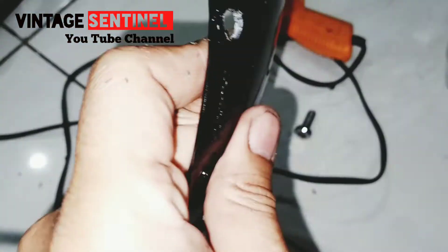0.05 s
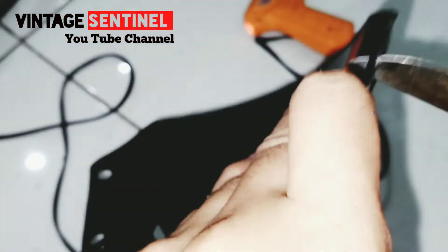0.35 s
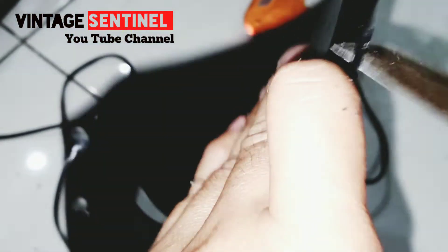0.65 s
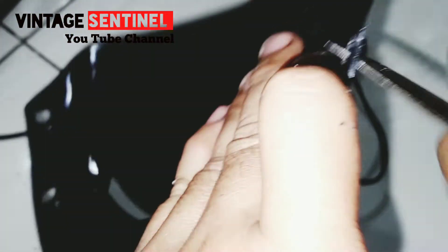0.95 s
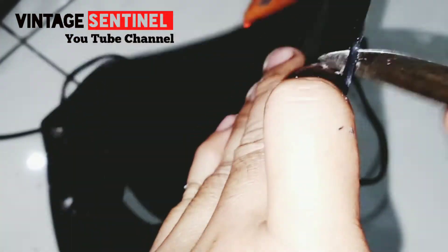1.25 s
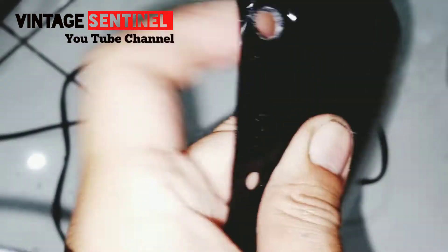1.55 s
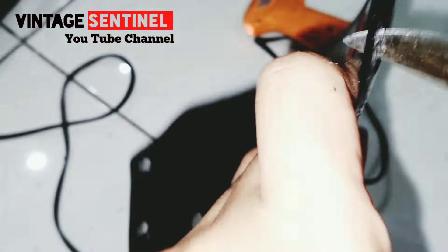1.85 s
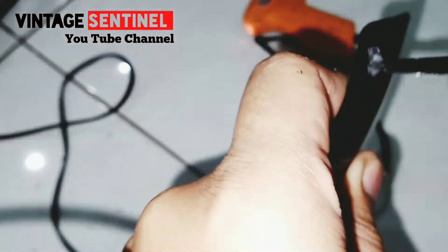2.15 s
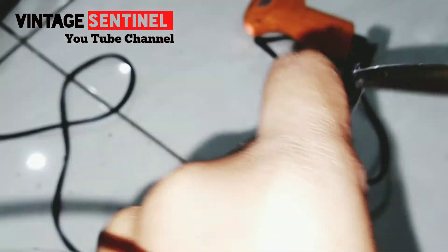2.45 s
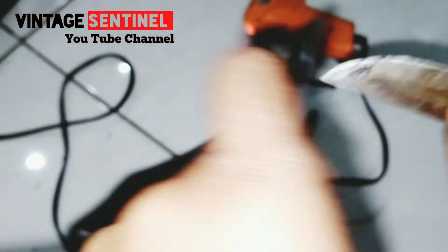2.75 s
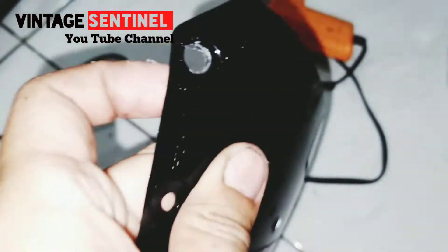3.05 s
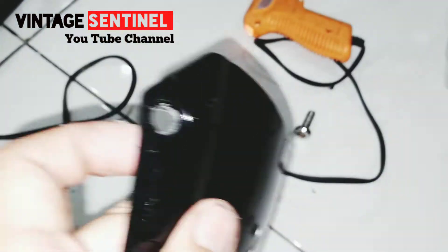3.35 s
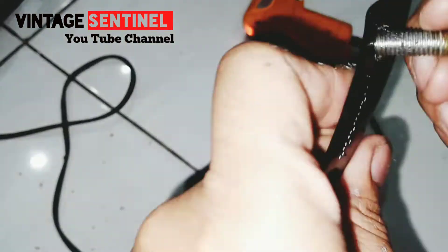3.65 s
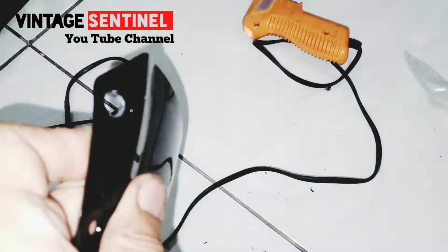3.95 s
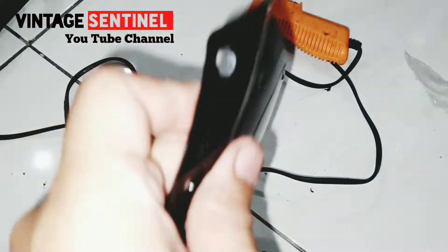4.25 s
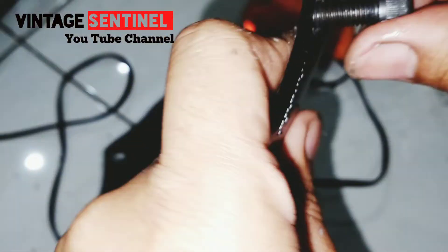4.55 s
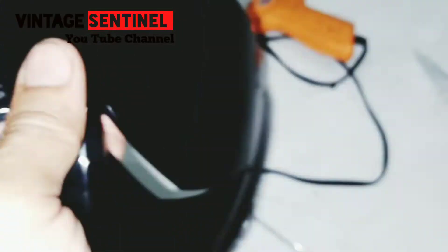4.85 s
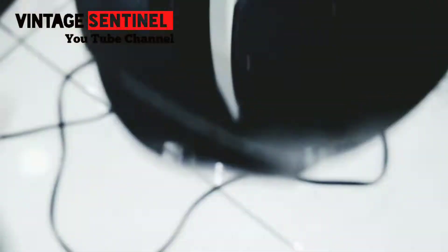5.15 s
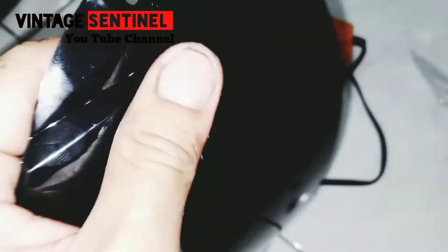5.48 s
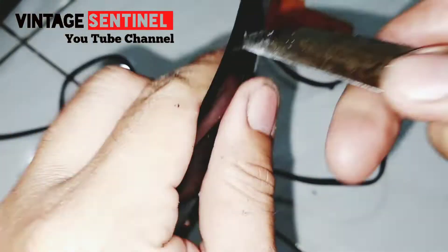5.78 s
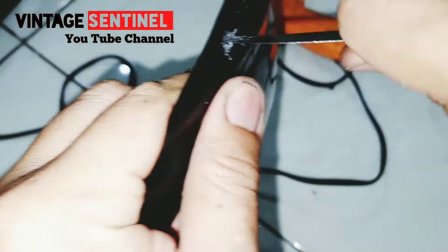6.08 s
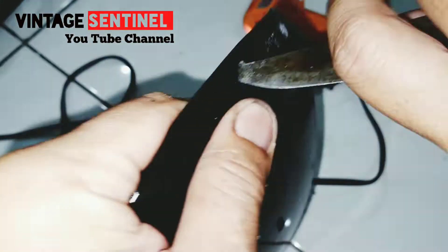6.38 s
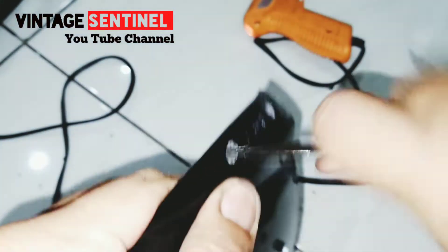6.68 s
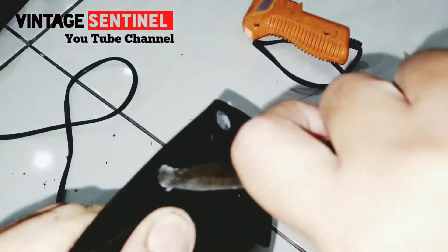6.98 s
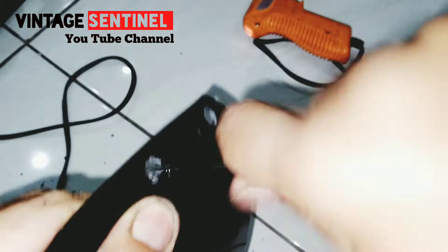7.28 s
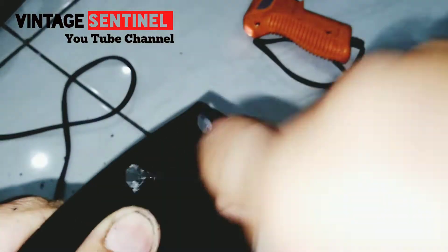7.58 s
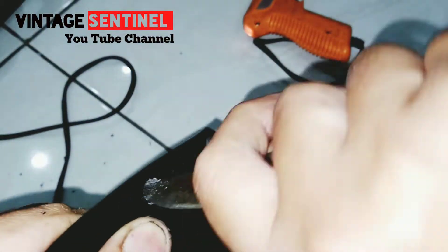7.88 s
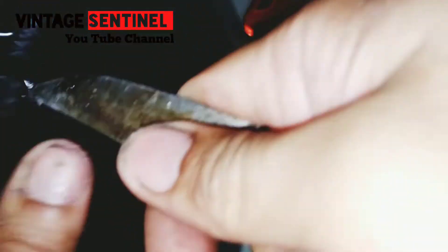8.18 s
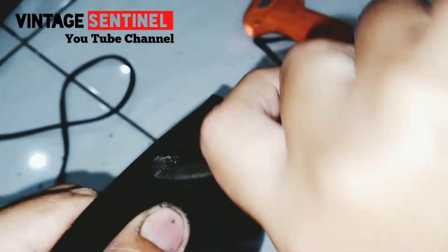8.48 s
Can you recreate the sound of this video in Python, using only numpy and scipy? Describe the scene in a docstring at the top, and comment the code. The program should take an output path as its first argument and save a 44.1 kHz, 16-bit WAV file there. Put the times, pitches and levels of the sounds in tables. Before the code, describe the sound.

A steel blade shaves the edge of a hard plastic shell, close to the microphone in a tiled room with a short echo. From 0.3 to 1.4 seconds it rasps back and forth about ten times a second, catching in bright, sharp snaps, the loudest slightly distorted. A faint, dull outdoor drone fades away underneath. Two more bouts run from 1.7 to 2.8 seconds. Between 2.9 and 4.3 seconds hands bump and rub the plastic with soft, low thuds, and a steel tool clinks on the floor at 3 seconds and again around 4 to 4.3. Brief scrapes come at 3.7 and 4.7 seconds. A hushed pause follows, with a few soft fingertip taps. From 5.9 to 8 seconds the scraping returns, grittier and dense with snaps and hollow knocks. A last bout runs from 8.3 seconds to the end, near 8.7.

```python
"""Shaving a plastic shell

A steel blade works the edge of a hard plastic shell, close to the microphone in a tiled room. It saws
to and fro about ten times a second, catching and letting go in snaps that ring the shell and overload
the recorder. Between bouts the hands shift their grip and a steel tool clinks on the floor. A dull
drone from outdoors fades away, and a noise suppressor hushes the pauses, where faint blips remain."""
import sys
import numpy as np
from scipy import signal
from scipy.fft import rfft, irfft, next_fast_len
from scipy.io import wavfile
from scipy.ndimage import uniform_filter1d, map_coordinates

SR = 44100
rng = np.random.default_rng(int(sys.argv[2]) if len(sys.argv) > 2 else 0)


def bounce(signal):
    """Save signal as a 16-bit WAV file at the path given by the first command-line argument."""
    frames = np.transpose(np.atleast_2d(signal))
    limited = np.clip(frames, -1, 1)
    pcm = np.round(limited * 32767).astype(np.int16)
    wavfile.write(sys.argv[1], SR, pcm)


N = 380583


def amp(db):
    return 10 ** (np.asarray(db) / 20)


def unit_rms(x):
    return x / np.sqrt(np.mean(x ** 2) + 1e-20)


def curve_at(points, hz):
    """Read (frequency, value) points along a log frequency axis."""
    knots_hz, values = np.transpose(points)
    return np.interp(np.log(hz + 1), np.log(knots_hz + 1), values)


def add(track, start_s, sound):
    part = track[max(round(start_s * SR), 0):][:len(sound)]
    part += sound[:len(part)]


def wobble(rate_hz):
    """A smooth random curve with rate_hz knots a second."""
    knots = rng.standard_normal(int(N * rate_hz / SR) + 4)
    return map_coordinates(knots, [np.arange(N) * rate_hz / SR])


def filtered(x, response):
    size = next_fast_len(N + SR // 2)
    return irfft(rfft(x, size) * response(np.fft.rfftfreq(size, 1 / SR)), size)[:N]


def noise(colour):
    return unit_rms(filtered(rng.standard_normal(N), lambda hz: amp(curve_at(colour, hz))))


def band(x, kind, hz, order=2):
    return signal.sosfilt(signal.butter(order, hz, kind, fs=SR, output="sos"), x)


# Spectra of the outdoor drone, the hands' rumble and the hiss: frequency_hz, gain_db
DRONE_SPECTRUM = [(100, -16.5), (400, 9), (650, -13), (1500, -31.5), (4500, -18), (7000, -46.5)]
RUMBLE_SPECTRUM = [(25, -13), (90, 2), (190, 1), (300, -19), (600, -31.5), (4000, -61.5)]
HISS_SPECTRUM = [(500, 3), (4800, 0.5), (7000, -17)]
# The drone fades while the hands rumble on near the microphone: time_s, drone_db, rumble_db
BACKGROUND_LEVELS = [(0, -53, -66), (1.199, -48.5, -61), (2.5, -68, -51.5), (3.2, -77.5, -60.5),
                     (5.6, -80, -68), (6.4, -83, -53), (7.702, -78.5, -73)]
def background(hiss_db=-71, waver_db=3, swell_db=2.9):
    """A dull drone from outdoors, the unsteady rumble of the hands and a faint steady hiss."""
    times, *levels = np.transpose(BACKGROUND_LEVELS)
    drone_db, rumble_db = [np.interp(np.arange(N) / SR, times, level) for level in levels]
    rumble = amp(rumble_db + waver_db * wobble(60) + swell_db * wobble(8)) * noise(RUMBLE_SPECTRUM)
    return amp(drone_db) * noise(DRONE_SPECTRUM) + rumble + amp(hiss_db) * noise(HISS_SPECTRUM)


# Decay of the tiled room: frequency_hz, t60_s
ROOM_DECAY = [(200, 0.21), (2500, 0.19), (5000, 0.16), (12000, 0.13)]
def tiled_room(x, delay_s=.004):
    """The hard walls answer, ever differently as the hands move; the treble dies first."""
    out, hop = np.zeros(N), SR // 8
    for start in range(0, N, hop):
        hz, t, spectrum = signal.stft(rng.standard_normal(SR // 2), SR, nperseg=256)
        decay = amp(-60 * t / curve_at(ROOM_DECAY, hz)[:, None])
        tail = signal.istft(spectrum * decay, SR, nperseg=256)[1]
        reflections = signal.fftconvolve(x[start:start + hop], tail / np.linalg.norm(tail))
        add(out, start / SR + delay_s, reflections)
    return out


def suppressor_blips(gain_db=-57, spread_db=2, centre_hz=2100, width_hz=380, rise_s=.008):
    """Faint, scattered, narrow-pitched blips of noise, heard in the pauses."""
    out, t = np.zeros(N), np.arange(SR // 16) / SR
    envelope = t / rise_s * np.exp(-t / rise_s)
    for start_s in rng.uniform(0, N / SR, size=480):
        hz = np.clip(centre_hz * np.exp(.7 * rng.standard_normal()), 500, 5500)
        blip = unit_rms(band(rng.standard_normal(len(t)), "bandpass", [hz, hz + width_hz]))
        add(out, start_s, amp(gain_db + spread_db * rng.standard_normal()) * blip * envelope)
    return out


# A low pop under a loud, overloaded snap (first row), then fingertips on the shell: time_s, level_db
LOW_POPS = [(2.245, -21), (2.895, -32), (3.134, -33), (3.449, -29), (4.878, -45), (5.2, -46), (5.36, -45),
            (5.4, -33)]
def low_pops(pitch_hz=135, decay_s=.005, tick_db=-24):
    """A brief low pulse with a faint tick on top."""
    out, t = np.zeros(N), np.arange(-SR // 50, SR // 30) / SR
    pulse = np.cos(2 * np.pi * pitch_hz * t)
    for time_s, db in LOW_POPS:
        tick = amp(tick_db) * unit_rms(band(rng.standard_normal(len(t)), "lowpass", 2200, order=1))
        add(out, time_s + t[0], amp(db) * (pulse + tick) * np.exp(-np.abs(t) / decay_s))
    return out


# Hands bump and rub the shell, close up: start_s, gain_db, extra_rub_db
HAND_BUMPS = [(1.704, -23, -17), (2.042, -26, -5.5), (2.159, -24.5, -7), (2.93, -21, -18.5),
              (3.047, -26, 9.5), (3.109, -23.5, -9.5), (3.707, -19, -13), (3.779, -30.5, 5),
              (3.886, -24.5, 2), (3.995, -20, -12), (4.057, -27, -1.5), (4.183, -38, 14), (4.21, -41, 14),
              (6.841, -34.5, -10), (7.465, -35.5, -5)]
def hand_bumps(thud_db=-5, rub_db=-7, rise_s=.021, decay_s=.029):
    """Soft flesh on plastic: a low thud and a dull rub, without ring."""
    out, t = np.zeros(N), np.arange(SR // 6) / SR
    envelope = (1 - np.exp(-t / rise_s)) * np.exp(-(t / decay_s) ** 2)
    for start_s, db, extra_rub_db in HAND_BUMPS:
        flesh, skin = rng.standard_normal((2, len(t)))
        thud = amp(thud_db) * unit_rms(band(flesh, "bandpass", [50, 150], order=3))
        rub = amp(rub_db + extra_rub_db) * unit_rms(band(skin, "bandpass", [280, 680]))
        add(out, start_s, amp(db) * (thud + rub) * envelope)
    return out


def ring(force, modes):
    """Damped modes driven by a force; the small shell radiates little below them."""
    t = np.arange(SR // 40) / SR
    response = sum((-1) ** k * amp(db) * width * np.exp(-np.pi * width * t) * np.sin(2 * np.pi * hz * t)
                   for k, (hz, width, db) in enumerate(modes))
    return band(signal.fftconvolve(force, response)[:len(force)], "highpass", .7 * modes[0][0])


# Bending modes of a steel tool's shaft and close modes of its flat tip: pitch_hz, gain_db
SHAFT_MODES = [(1830, -9), (3300, 1), (5570, -1), (8700, -10.5), (12450, -19)]
TIP_MODES = [(1520, -24), (2486, -18), (3031, -9.5), (4000, -4.5), (4372, -1), (4554, 2), (5443, -11),
             (6190, -16), (6815, -18)]
# The tool bounces on the floor tiles, except at 3.3 s, which is a very faint, high tinkle in the
# pause: start_s, shaft_gain_db, tip_gain_db
CLINKS_AND_TINKLE = [(2.979, -40, -25.5), (3.302, -69, -58), (4.02, -40, -54.5), (4.228, -50, -38.5),
                     (4.287, -47, -38), (4.32, -41, -49)]
def clinks(gain_db=-6, attack_s=.004, chatter_s=.016, damp_s=.115, scuff_db=-8):
    """Steel chatters on tile, feeding each mode by chance, and rattles until the hand damps it."""
    out, t = np.zeros(N), np.arange(SR // 3) / SR

    def struck(modes, t60_s):
        return sum(amp(db - 60 * t / t60_s) * np.sin(2 * np.pi * hz * t) for hz, db in modes)

    shaft, tip = struck(SHAFT_MODES, t60_s=.08), struck(TIP_MODES, t60_s=.16)
    damping = np.exp(-(t / damp_s) ** 4)
    for start_s, shaft_db, tip_db in CLINKS_AND_TINKLE:
        contact = amp(4 * wobble(200)[:len(t)]) * (1 - np.exp(-t / attack_s)) * np.exp(-t / chatter_s)
        force = rng.standard_normal(len(t)) * contact
        clink = amp(tip_db + scuff_db) * unit_rms(ring(force, EDGE_MODES))  # scuff under the tones
        for db, response in ((shaft_db, shaft), (tip_db, tip)):
            rattle = amp(2.5 * wobble(170)[:len(t)])
            clink += amp(db) * unit_rms(rattle * signal.fftconvolve(force, response)[:len(t)])
        add(out, start_s, amp(gain_db) * clink * damping)
    return out


def blade_ring(cut, centre_hz=4450, width_hz=600, t60_s=.075, gain_db=-25):
    """The thin blade rings on briefly after every catch, in a cluster of close modes."""
    t = np.arange(SR // 5) / SR
    cluster_hz = [centre_hz - width_hz / 2, centre_hz + width_hz / 2]
    tail = band(rng.standard_normal(len(t)), "bandpass", cluster_hz) * amp(-60 * t / t60_s)
    return amp(gain_db) * signal.fftconvolve(cut, tail / np.linalg.norm(tail))[:N]


def rim_echo(force, reflection=.55, trip_s=.0008):
    """The bending wave returns from the rim after a trip that differs with each contact, colouring it."""
    lag = 1 + int(trip_s * SR * np.exp(.3 * rng.standard_normal()))
    return force - reflection * np.pad(force, (lag, 0))[:len(force)]


# Resonances of the cut edge and of the whole flexing panel: pitch_hz, width_hz, gain_db
EDGE_MODES = [(4290, 1120, 0), (4697, 1310, -2.5), (10500, 14000, -48.5)]
PANEL_MODES = [(380, 130, -18.5), (600, 150, -22), (870, 130, 1.5), (1200, 220, 0), (1710, 110, -0.5)]
# Resonances of the shell's wall: pitch_ratio, width_hz, gain_db
WALL_MODES = [(.76, 370, 13), (1, 306, 20.5), (1.08, 370.7, -11.5)]
# The wall follows the grip and the place of the cut: time_s, pitch_hz, level_re_edge_db
WALL_TUNING = [(0.303, 2314, -10), (1.001, 2240, -1.5), (1.949, 2260, -1), (2.25, 2480, 3),
               (2.5, 2740, 4.5), (2.75, 2655, 1.5), (3.699, 2150, -1.5), (6, 2504, -3), (7.002, 2155, -11),
               (8.6, 2100, -11.5)]
# Gritty treble of the cut at the usual bite: time_s, level_re_edge_db
GRIT_LEVELS = [(0.3, -31), (0.9, -38), (2.4, -29), (4.7, -48), (6.3, -23.5), (7.6, -24.5), (8.5, -23)]
def shell(force, time_s, db, panel_db, grit_hz=(7500, 11000), usual_bite_db=-22, grit_db_per_db=.35):
    """The shell rings; the point of contact shifts its resonances, and a hard bite is grittier."""
    def tuned(modes, factor):
        return [(pitch * factor, width, gain) for pitch, width, gain in modes]

    times, pitches, levels = np.transpose(WALL_TUNING)
    edge_shift, wall_shift = 1 + np.array([.04, .02]) * rng.standard_normal(2)
    wall_hz = wall_shift * np.interp(time_s, times, pitches)
    grit_db = np.interp(time_s, *np.transpose(GRIT_LEVELS)) + grit_db_per_db * (db - usual_bite_db)
    force = rim_echo(force)
    edge = unit_rms(ring(force, tuned(EDGE_MODES, edge_shift)))
    wall = amp(np.interp(time_s, times, levels)) * unit_rms(ring(force, tuned(WALL_MODES, wall_hz)))
    panel = amp(panel_db) * unit_rms(ring(force, PANEL_MODES))
    grit = amp(grit_db) * unit_rms(band(force, "bandpass", grit_hz))
    return amp(db) * (edge + wall + panel + grit)


# The blade brushes the edge lightly: start_s, gain_db
LIGHT_TOUCHES = [(.27, -45.5), (1.699, -47), (2.07, -49.5), (2.93, -51.5), (3.7, -45.5), (3.617, -48.5),
                 (4.504, -50), (5.693, -46), (8.262, -38)]
# Bouts of sawing: start_s, first_push_s, end_s, period_s, push_gain_db, slide_gain_db, panel_re_edge_db
SAWING_BOUTS = [(0.335, .402, 1.42, .1265, -22, -32, -15),
                (1.755, 1.783, 2.053, 0.084, -24.5, -37.5, -15.5),
                (2.207, 2.205, 2.8, .1025, -30, -37.5, -12.5),
                (3.725, 3.786, 3.975, 0.102, -35.5, -42, -8.5), (4.625, 4.707, 4.77, .1, -27.5, -42, -8),
                (5.887, 5.887, 6.245, 0.12, -29.5, -33.5, -7.5),
                (6.268, 6.273, 7.505, .0925, -24, -30.5, -13), (7.507, 7.548, 8.02, 0.13, -22.5, -29, -12),
                (8.287, 8.315, 8.65, 0.094, -28.5, -30.5, -10)]
def strokes(push_s=.04, return_s=.028, touch_s=.03, lift_s=.06, spread_db=.46, touch_panel_db=-9):
    """The blade slides through each bout, biting and dragging back: start_s, end_s, gain_db, panel_db."""
    rows = [(start_s, start_s + touch_s, db, touch_panel_db) for start_s, db in LIGHT_TOUCHES]
    for start_s, first_push_s, end_s, period_s, push_db, slide_db, panel_db in SAWING_BOUTS:
        rows.append((start_s, end_s, slide_db, panel_db))
        push = (push_s, push_db, panel_db)
        way_back = (return_s, push_db - 7, panel_db + 2)  # lighter and duller
        for k, mid_s in enumerate(np.arange(first_push_s, min(end_s - lift_s, N / SR), period_s / 2)):
            length_s, db, stroke_panel_db = way_back if k % 2 else push
            db += spread_db * rng.standard_normal()
            rows.append((mid_s - length_s / 2, mid_s + length_s / 2, db, stroke_panel_db))
    return rows


def shaving(gain_db=-3, slips_per_s=200, spread_db=6.8, slip_s=.0014, fade_s=.015, ease_share=.09):
    """The sliding blade sticks and slips in a dense, uneven rasp that shakes the shell."""
    times = np.cumsum(rng.gamma(3, 1 / 3, 4000)) / slips_per_s
    times = times[times < N / SR]
    slips = np.bincount((times * SR).astype(int), amp(spread_db * rng.standard_normal(len(times))), N)
    drag = .4 + unit_rms(signal.lfilter([1], [1, -np.exp(-1 / (slip_s * SR))], slips))
    friction, out = drag * rng.standard_normal(N), np.zeros(N)
    for start_s, end_s, db, panel_db in strokes():
        rasp = friction[int(start_s * SR):int(end_s * SR)]
        ease_off = np.minimum(1, np.linspace(1, 0, len(rasp)) / ease_share)
        fades = signal.windows.tukey(len(rasp), 2 * fade_s / (end_s - start_s))
        force = np.pad(unit_rms(rasp * ease_off * fades), (0, SR // 100))
        add(out, start_s, shell(force, (start_s + end_s) / 2, db + gain_db, panel_db))
    return out


# Right at the microphone, the blade catches sharply or lands flat on the hollow panel: time_s, gain_db
BLADE_SNAPS = [(.32, 5.5), (.3835, -4), (.3936, -7), (.4134, -11), (.531, 0), (.5452, -11), (.599, 0),
               (.644, -6), (.728, -8), (.7475, -6), (.893, -9), (.912, -6), (.9966, -4.5), (1.0157, -6.5),
               (1.0996, -11), (1.1517, -8), (1.158, 2), (1.166, -4), (1.2155, -4), (1.2852, -11),
               (1.296, -11), (1.757, 0), (1.7697, -7.5), (1.7757, -1), (1.8013, -10), (1.871, -7),
               (1.879, 0), (1.9444, -4), (1.9636, -7.5), (2.192, -14), (2.2106, -11), (2.244, 2),
               (2.2923, -10.5), (2.3096, -8.5), (2.325, -14.5), (2.358, -13.5), (2.404, -6), (2.4094, -5),
               (2.4168, -5.5), (2.4487, -7.5), (2.5068, -6), (2.5212, 1.5), (2.5468, -1), (2.5927, -9.5),
               (2.598, -10), (2.615, -12), (2.663, 1.5), (2.7103, -8), (3.9429, -16), (4.708, -8),
               (5.9995, -11), (6.0587, -7), (6.1686, -9), (6.2654, -3.5), (6.284, 1.5), (6.3594, -7.5),
               (6.414, -11.5), (6.545, 6.5), (6.633, 2.5), (6.6938, -8.5), (6.7282, -4), (6.8243, -4.5),
               (6.8314, -4), (6.8693, -7), (6.9152, 1), (7.0004, -3), (7.0096, -7), (7.018, -1),
               (7.0982, -6), (7.1922, -6), (7.2962, -8), (7.38, -7), (7.4354, -12), (7.5066, -8),
               (7.5297, -1), (7.5416, -5), (7.564, -3.5), (7.6013, -9), (7.6562, -8), (7.6777, -1),
               (7.7012, 3), (7.8007, -5), (7.8657, 1), (7.9494, -3.5), (8.419, -5.5), (8.5162, -4),
               (8.6235, -7.5)]
PANEL_KNOCKS = [(1.829, -9), (2.6446, -14), (3.752, -17.5), (3.7935, -14), (4.6109, -14), (5.8885, -23),
                (6.3096, -8.5), (6.3874, -13), (6.439, -13.5), (6.497, -9.5), (6.656, -10), (6.7752, -14),
                (7.2067, -14), (7.827, -2.5), (8.3122, -13.5), (8.3522, -16), (8.4074, -10), (8.4677, -11),
                (8.5224, -4.5), (8.565, -14)]
def snaps(gain_db=-19.5, rise_s=.0007, tear_s=.0022, creep_s=.0035, creep_db=-30, knock_panel_db=-1):
    """The edge creeps under strain, then lets go: a snap rings mostly the edge, a knock the panel too."""
    def nearest_bout_panel_db(time_s):
        return min(SAWING_BOUTS, key=lambda bout: max(bout[0] - time_s, time_s - bout[2]))[-1]

    out, t = np.zeros(N), np.arange(-SR // 60, SR // 30) / SR
    since_release = np.maximum(t, 0)
    creak = amp(creep_db) * np.exp(-np.abs(t) / creep_s)
    catches = [(time_s, db, nearest_bout_panel_db(time_s) - 1) for time_s, db in BLADE_SNAPS]
    catches += [(time_s, db, knock_panel_db) for time_s, db in PANEL_KNOCKS]
    for time_s, db, panel_db in catches:
        length_s = tear_s * np.exp(.13 * rng.standard_normal())
        tear = (1 - np.exp(-since_release / rise_s)) * np.exp(-(since_release / length_s) ** 2)
        force = rng.standard_normal(len(t)) * (tear + creak)
        add(out, time_s + t[0] - rise_s, shell(force, time_s, db + gain_db, panel_db))
    return out


def scene(room_db=-14):
    """The work close to one microphone, with the tiled room and the background behind it."""
    cut = snaps() + shaving()
    direct = cut + blade_ring(cut) + clinks() + hand_bumps() + low_pops() + suppressor_blips()
    return (direct + amp(room_db) * tiled_room(direct) + background())[None]


def noise_suppressor(x, threshold_db=-85, depth_db=14, pause_db=-54, bass_hz=250):
    """Turns down quiet frequencies above the bass, and all of them in a pause; stray patches get by."""
    def below(power, db):
        return 1 / (1 + (power / amp(db) ** 2) ** 4)

    hz, _, spectrum = signal.stft(x, SR, nperseg=512)
    above_bass = (hz > bass_hz)[:, None]
    power = uniform_filter1d(np.abs(spectrum) ** 2, size=2, axis=0)  # smooth over frequency
    power = np.abs(uniform_filter1d(power, size=6, axis=1))  # and over time
    pause = below(np.sum(power * above_bass, axis=0), pause_db)
    quiet = below(power, threshold_db) + .5 * pause
    return signal.istft(spectrum * amp(-depth_db * quiet * above_bass), SR, nperseg=512)[1][:N]


# Response of the microphone: frequency_hz, gain_db
MIC_RESPONSE = [(5000, -1.5), (8000, 0), (11000, -5.5), (13000, -8), (16000, -6.5)]
def record(dry, ceiling=.87, hardness=12, asymmetry=.06, self_noise_db=-82, top_hz=16200):
    """Noise suppression, microphone colour, self-noise, overload on the loudest snaps, band limit."""
    x = filtered(noise_suppressor(dry[0]), lambda hz: amp(curve_at(MIC_RESPONSE, hz)))
    x += amp(self_noise_db) * rng.standard_normal(N)
    limit = ceiling * (1 - asymmetry * (x < 0))  # one side clips first, which adds a low pop
    clipped = x / (1 + np.abs(x / limit) ** hardness) ** (1 / hardness)
    return filtered(clipped, lambda hz: hz < top_hz)[None]


dry = scene()
out = record(dry)
bounce(out)
```